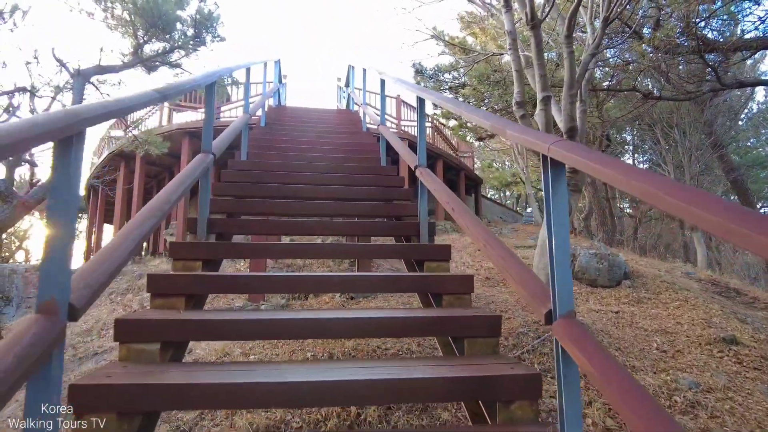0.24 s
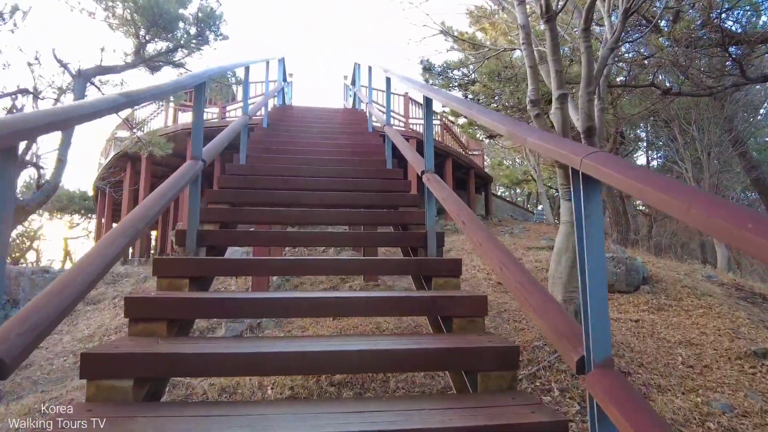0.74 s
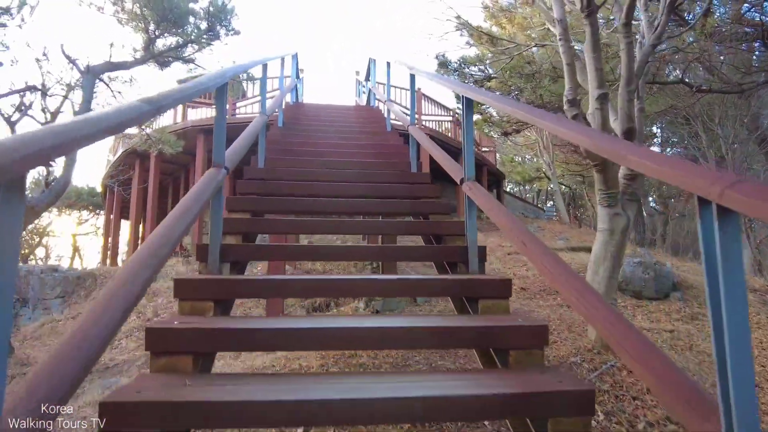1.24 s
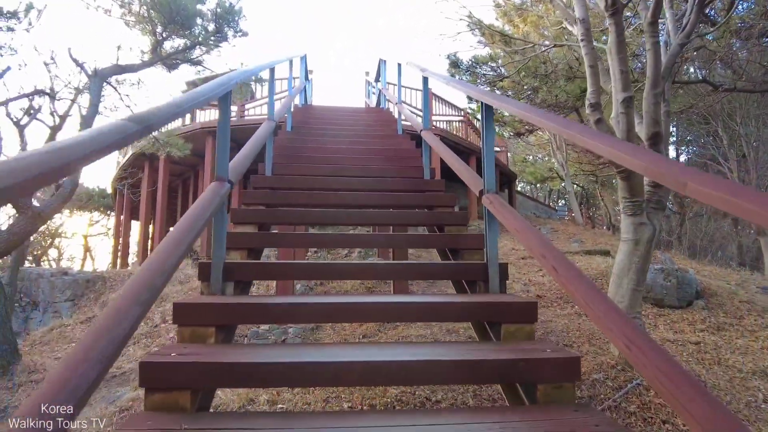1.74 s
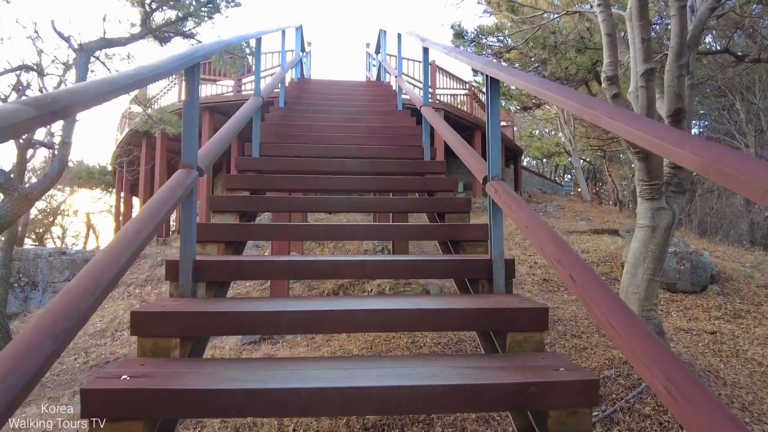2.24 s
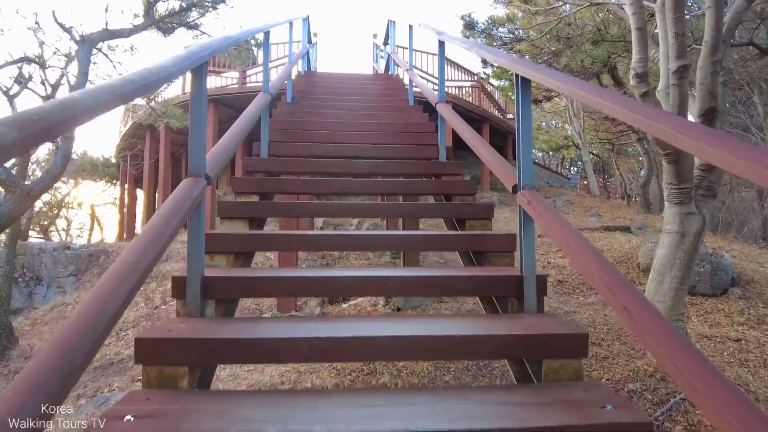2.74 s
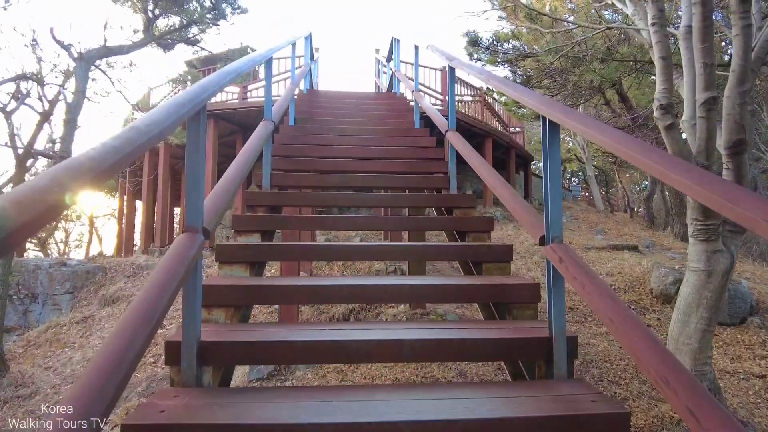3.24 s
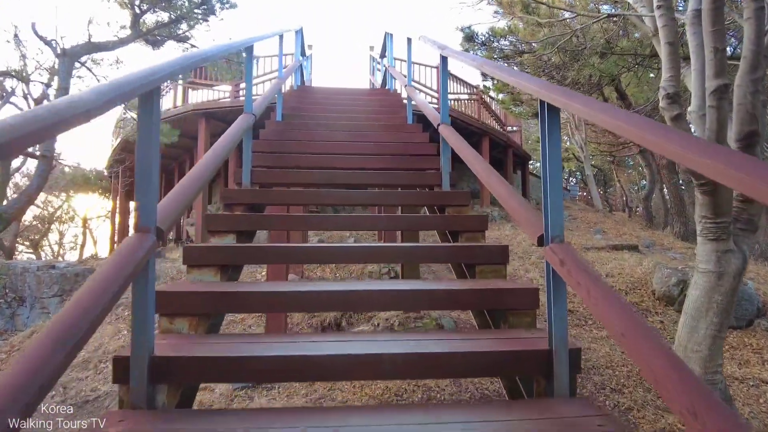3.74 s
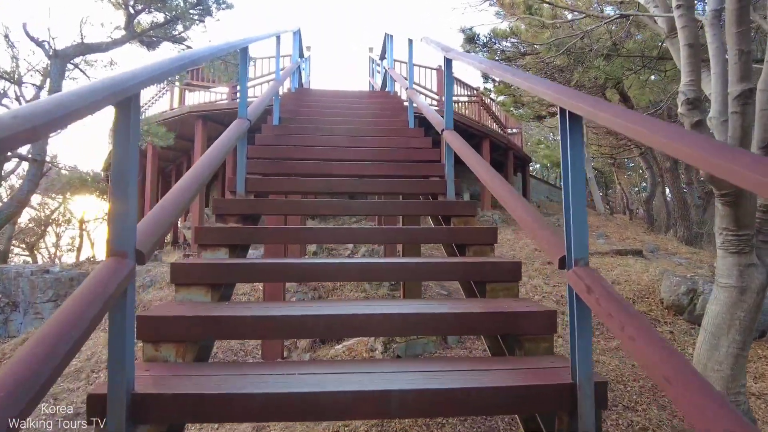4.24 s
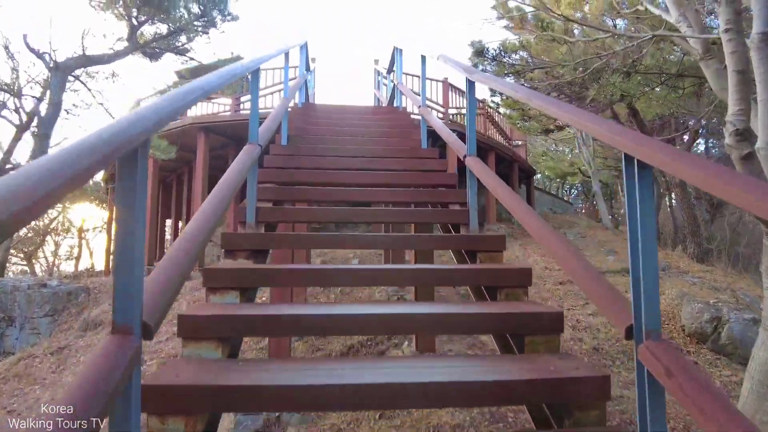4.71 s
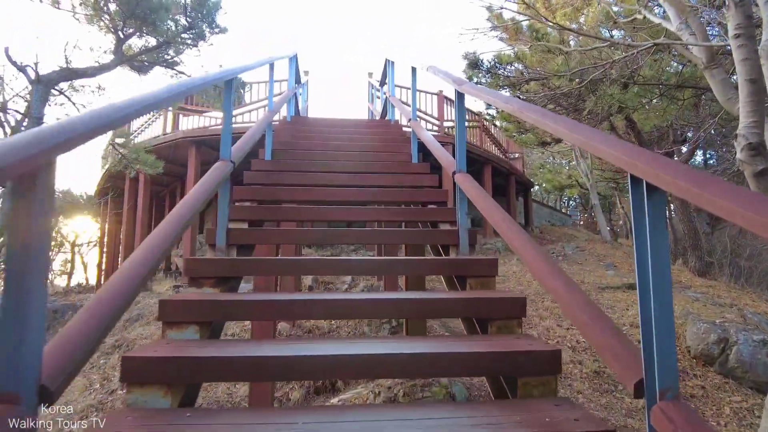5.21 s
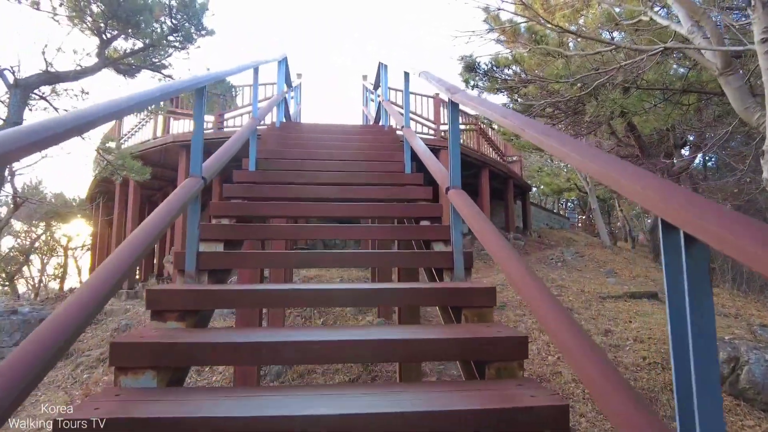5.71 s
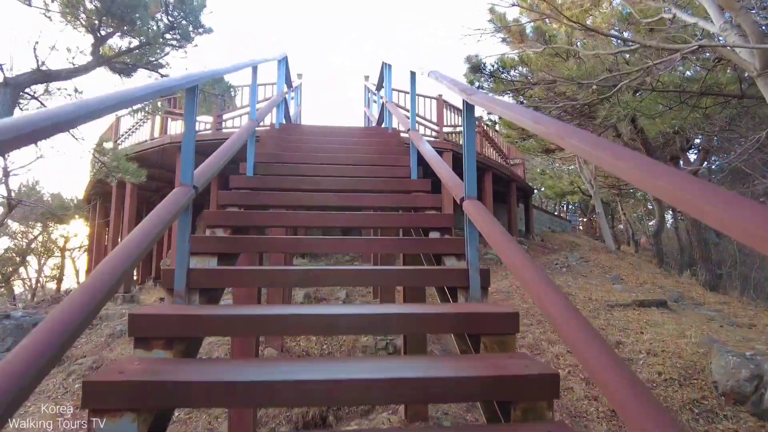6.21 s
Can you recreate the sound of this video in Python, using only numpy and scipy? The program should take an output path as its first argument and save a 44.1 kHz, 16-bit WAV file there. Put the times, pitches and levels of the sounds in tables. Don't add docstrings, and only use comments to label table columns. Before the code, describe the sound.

One person climbs an outdoor wooden staircase. Soft rubber soles slap, scuff and knock hollowly on the planks about twice a second, some steps firm, others faint, the first strongest with a low thump. Clothes swish between steps and small gear ticks appear. A deep distant rumble and faint hiss continue underneath. The carried stereo microphone sits close above the feet, with only a short open-air reflection.

```python
import sys
import numpy as np
from scipy import signal
from scipy.fft import rfft, irfft, next_fast_len
from scipy.io import wavfile
from scipy.ndimage import uniform_filter1d, map_coordinates

SR = 44100
rng = np.random.default_rng(int(sys.argv[2]) if len(sys.argv) > 2 else 0)


def store_pcm(level_fs):
    pcm = np.round(np.clip(level_fs, -1, 1) * 32767).astype(np.int16)
    wavfile.write(sys.argv[1], SR, np.atleast_2d(pcm).T)


def undo_db(level):
    steps = np.asarray(level, float) / 20
    return 10 ** steps


N = 285272
HALVES = np.array([[0.5], [-0.5]])

# (time [s], peak level [dB], slap pitch [Hz], knock level [dB], knock pitch [Hz])
SOLE_SLAPS = [(0.2753, -27.5, 786, -3.5, 190), (0.2769, -22, 874, -11, 223), (0.304, -48, 910, -12, 200),
              (1.124, -46.5, 536, 6.5, 210), (1.136, -24, 1007, -14.5, 250), (1.32, -61.5, 600, 13.5, 210),
              (1.533, -36.5, 600, 15.5, 409), (1.54, -33.5, 575, 8.5, 371), (1.9759, -40, 626, 1.5, 315),
              (1.993, -44.5, 1180, 4, 227), (2.362, -45, 1340, 2, 267), (2.776, -41, 590, 4, 260),
              (3.303, -40.5, 920, -21, 256), (3.646, -43, 930, 4, 189), (3.658, -33.5, 830, -1.5, 407),
              (4.108, -59.5, 634, 17, 352), (4.482, -41, 613, 4, 178), (4.495, -25, 1190, -6.5, 376),
              (5.275, -55, 1030, 17.5, 217), (5.289, -19.5, 1066, -17, 384), (5.8218, -45, 870, -19, 229),
              (6.092, -48.5, 606, 0.5, 283), (6.113, -46.5, 720, 3.5, 183)]
# (time [s], share of the port lag [0-1])
FOOT_BEARING = [(.28, 0.21), (1.13, 0.45), (1.54, 0.77), (1.98, 0.48), (2.37, 0.76), (2.78, 0.84),
                (3.3, 0.2), (3.65, 0.42), (4.11, 0.25), (4.49, 0.65), (5.28, 0.18), (5.8, 0.15),
                (6.1, 0.67)]
# (frequency [Hz], lag [rad])
FOOT_LAG = [(100, 0.5), (250, 0.5), (400, 1.23), (650, 2.06), (900, 4), (1100, 7), (1330, -2), (1500, 1),
            (3000, 6)]
# (frequency [Hz], level [dB])
SCUFF_SPECTRUM = [(100, -14), (200, 11), (500, 9), (1200, -3.5), (1700, -12), (3000, -24), (5000, -59),
                  (20000, -120)]
# (time [s], peak level [dB], centre [Hz], pan [dB])
EDGE_CRACKS = [(0.2757, -25, 1970, 2), (1.125, -40.5, 1610, -5), (1.1362, -39, 2280, -1),
               (1.532, -48, 1740, 9), (1.9767, -34, 1880, -1), (1.992, -42, 1770, -1.5),
               (2.364, -38, 2170, 0), (2.776, -34, 1760, -3), (2.785, -44, 1290, 4),
               (3.302, -57, 1530, 1.0), (3.658, -45, 2030, 1), (4.112, -57, 1500, 0),
               (4.4956, -42.5, 2160, 0), (5.2898, -39, 2310, -3), (6.0912, -48, 2680, -3),
               (6.094, -44, 1250, 0)]
# (time [s], peak level [dB], pitch [Hz], t60 [s], rise [s])
SPAN_THUDS = [(0.2745, -19.5, 123, 0.1, 0.015), (0.305, -25, 100, 0.083, 0.01),
              (0.341, -36, 107.3, 0.39, 0.0012), (1.132, -40, 109.4, 0.27, 0.016),
              (1.261, -51, 102, 0.31, 0.0092), (1.532, -26.5, 119, 0.13, 0.013),
              (1.649, -42.5, 111.5, 0.15, 0.016), (1.717, -46, 113, 0.18, 0.011),
              (1.994, -29, 106, 0.21, 0.019), (2.202, -50, 109, 0.14, 0.014),
              (2.354, -45, 112.3, 0.42, 0.012), (2.43, -45, 109, 0.21, 0.0079),
              (2.7729, -31.5, 112.5, 0.12, 0.0088), (2.799, -37, 103, 0.18, 0.0075),
              (3.663, -42, 102, 0.23, 0.0063), (4.491, -37.5, 95, 0.3, 0.022),
              (4.537, -43, 98, 0.067, 0.01), (5.276, -33.5, 137.3, 0.18, 0.028),
              (5.765, -37.5, 56, 0.13, 0.0071), (6.09, -43, 110.2, 0.21, 0.025)]
# (time [s], click level [dB], body level [dB], bright level [dB], body pitch [Hz])
GEAR_TICKS = [(0.1277, -57, 5, -20, 1370), (0.185, -63, 10, -25, 1100), (0.398, -46.5, 1.5, -31, 1380),
              (0.685, -61, 8, -30, 800), (0.775, -55.5, 12, -30, 600), (0.826, -59, 15, -25, 1500),
              (1.0963, -63.5, 13, -13, 1490), (1.365, -64, -9, -6, 2500), (1.6275, -50.5, -5, -19, 1290),
              (1.727, -69, -9, 6, 1300), (1.7853, -70, -6, 5, 1300), (2.514, -39.5, -12, -10.5, 700),
              (2.526, -43.5, -12, -14, 600), (3.062, -60, -2, -19, 1500), (3.2455, -61, 8, -8, 1195),
              (3.256, -48, -11, -8.5, 1300), (3.262, -62, 2, -12, 1500), (3.2713, -60, 3, -14, 1890),
              (3.2768, -55, -2, -6, 1200), (3.2873, -49, -3, -9, 1500), (3.3057, -54.5, -11, -0.5, 1300),
              (3.3124, -48, 5.5, -11, 1260), (3.6345, -52, 5, -11, 1290), (3.965, -61, -8.5, -5, 1300),
              (4.2083, -56, 5.5, -9, 1430), (4.5358, -53, -6, -6, 1300), (4.5921, -52, 4.5, -15, 1200),
              (4.675, -52, -1, -30, 1500), (5.624, -62, 11, -25, 1500), (5.7615, -49, 3, -25, 1140),
              (5.7804, -46.5, -4, -22, 1200), (5.834, -59, 9, -34, 1300), (6.19, -58, 8, -21, 1600),
              (6.4248, -55.5, -4, -9, 1390)]
# (frequency [Hz], level [dB])
SNAP_SPECTRUM = [(1300, -0.5), (2200, -3.5), (3500, -7), (4800, -15), (6500, -61)]
# (frequency [Hz], level [dB])
SPARK_SPECTRUM = [(4000, -12), (5500, -5), (8500, -12), (12000, -19), (15500, -19)]
# (peak time [s], rise [s], fall [s], level [dB], brightness [dB])
CLOTH_RUBS = [(0.034, 0.12, 0.077, -74.5, -0.5), (0.227, 0.17, 0.23, -66, 0.5),
              (0.382, 0.3, 0.15, -67.5, -4.5), (0.74, 0.19, 0.17, -61, -1), (0.969, 0.089, 0.44, -77, -2),
              (1.174, 0.11, 0.13, -70, -1.5), (1.33, 0.18, 0.29, -80.5, 0), (1.47, 0.057, 0.12, -71, -5.5),
              (1.56, 0.072, 0.3, -76.5, 3.5), (1.67, 0.16, 0.062, -80.5, 3), (1.8, 0.067, 0.23, -76, 1),
              (2.0, 0.19, 0.13, -63.5, 2.5), (2.102, 0.044, 0.079, -68.5, 4),
              (2.403, 0.28, 0.25, -67.5, 1.5), (2.511, 0.18, 0.13, -67.5, -11),
              (2.667, 0.11, 0.37, -69, -2), (2.882, 0.14, 0.16, -67.5, 1.5),
              (3.297, 0.69, 0.12, -81.5, -1.5), (3.616, 0.11, 0.37, -74, -2.5),
              (3.8, 0.24, 0.17, -73.5, -1), (4.066, 0.35, 0.067, -71, -1.7),
              (4.163, 0.25, 0.28, -73.5, -1.5), (4.56, 0.37, 0.08, -71, -43),
              (4.91, 0.62, 0.083, -67.5, -2.5), (5.088, 0.52, 0.11, -72, -1.5),
              (5.353, 0.13, 0.33, -70, -2), (5.53, 0.2, 0.048, -73, -0.5), (5.68, 0.09, 0.43, -70.5, -10),
              (5.85, 0.25, 0.057, -62.5, -2.5), (6.16, 0.14, 0.16, -70.5, -3),
              (6.27, 0.11, 0.089, -77, -1.5), (5.99, 0.062, 0.13, -80, -11)]
# (peak time [s], rise [s], fall [s], level [dB])
SHELL_SLIDES = [
    (1.94, 0.071, 0.079, -72.5),
    (2.96, 0.43, 0.07, -77),
    (3.718, 0.043, 0.21, -80),
    (4.844, 0.085, 0.11, -67.5),
    (5.51, 0.24, 0.046, -86),
    (5.851, 0.04, 0.29, -94),
]
# (frequency [Hz], level [dB per Hz])
FOLD_SPECTRUM = [(400, -2), (700, -4.5), (1080, -4), (1350, -1), (1650, -5.5), (2000, -12.5), (3000, -41)]
# (frequency [Hz], level [dB per Hz])
SWISH_SPECTRUM = [(1500, -1), (2200, -3.5), (2900, -1.5), (3500, -8), (4500, -9.5), (6500, -34)]
# (frequency [Hz], level [dB per Hz])
WEAVE_SPECTRUM = [(3500, -6.5), (5000, -1.5), (7000, -4), (11000, -14), (13500, -38)]
# (frequency [Hz], level [dB per Hz])
SHEEN_SPECTRUM = [(8000, -7.5), (10500, -4.5), (13000, -1), (15500, 1.5), (17000, -20)]
# (frequency [Hz], t60 [s])
HILLSIDE_DECAY = [(150, 0.29), (1000, 0.088), (5000, 0.16)]
# (time [s], level [dB])
RUMBLE_LEVEL = [(0, -48), (.3, -48.5), (.55, -45), (1.1, -46.5), (1.9, -49), (2.3, -47.5), (2.9, -45),
                (3.5, -47), (3.95, -45.5), (4.5, -49), (4.8, -46), (5.2, -52.5), (5.6, -48.5), (6, -50.5),
                (6.44, -45), (6.47, -50)]
# (frequency [Hz], level [dB per Hz])
RUMBLE_SPECTRUM = [(8.8, -35), (15, 2), (54, 7), (84, -2), (140, -23), (180, -50), (310, -120)]
# (time [s], level [dB])
HUM_LEVEL = [(0, -58), (.25, -59.5), (.55, -61), (.8, -55), (1.3, -58), (1.7, -56.5), (2.4, -61),
             (3, -58.5), (3.3, -58), (3.45, -57.5), (3.58, -57), (3.9, -60), (4.7, -49.5), (4.95, -60),
             (5.15, -57.5), (5.6, -57), (6.05, -56.5), (6.47, -58.5)]
# (frequency [Hz], level [dB per Hz])
HUM_SPECTRUM = [(59, -36.5), (100, -3.5), (156, -6), (312, -14), (404, -13.5), (687, -26.5), (1000, -33.5),
                (1300, -92)]
# (frequency [Hz], level [dB per Hz])
HISS_SPECTRUM = [(470, -44), (800, -5.5), (1300, -6.5), (2100, -15), (7000, -20), (12600, -27.5),
                 (13200, -43)]
# (frequency [Hz], correlation [-1 to 1])
PORT_LIKENESS = [(60, 0.99), (220, 0.9), (400, 0.69), (650, 0.29), (1000, 0.18), (1500, 0.85), (2700, 0.54),
                 (5000, 0.29), (11000, 0.14)]
# (frequency [Hz], lead [rad])
LEFT_LEAD = [(60, 0), (220, .2), (400, .5), (650, 1), (950, 2.6), (1120, 2.6), (1300, .4), (2700, 1),
             (5000, .6), (11000, -.8)]


def unit(x):
    return x / np.sqrt(np.mean(x ** 2) + 1e-20)


def peak_one(x):
    return x / np.abs(x).max()


def along(points, hz):
    f, v = np.transpose(points)
    return np.interp(np.log(hz + 1), np.log(f + 1), v)


def over_time(rows):
    s, value = np.transpose(rows)
    return np.interp(np.arange(N) / SR, s, value)


def wobble(rate):
    knots = rng.standard_normal(int(N * rate / SR) + 4)
    return map_coordinates(knots, [np.arange(N) * rate / SR])


def filtered(x, response):
    m = next_fast_len(x.shape[-1] + 4096)
    return irfft(rfft(x, m) * response(np.fft.rfftfreq(m, 1 / SR)), m)[..., :x.shape[-1]]


def band(hz, centre_hz, width):
    return np.exp(-(np.log((hz + 1) / centre_hz) / width) ** 2)


def pan(db):
    return undo_db(db * HALVES)


def port_phase(lead_rad):
    return np.exp(1j * lead_rad * HALVES)


def rush(spectrum, patchy_db):
    z = signal.stft(rng.standard_normal((2, N)), nperseg=512)[2]
    field = uniform_filter1d(rng.standard_normal(z.shape[1:]), size=8, axis=0)
    field = uniform_filter1d(field, size=8, axis=1)
    pair = signal.istft(z * undo_db(patchy_db * unit(field)), nperseg=512)[1][:, :N]
    closed = [(spectrum[0][0] / 2, -120)] + list(spectrum) + [(spectrum[-1][0] * 2, -120)]

    def mid_side(hz):
        angle = np.arccos(np.clip(along(PORT_LIKENESS, hz), -1, 1)) / 2
        return undo_db(along(closed, hz)) * [np.cos(angle), np.sin(angle)]

    mid, side = filtered(pair, mid_side)
    stereo = np.array([mid + side, mid - side])
    return unit(filtered(stereo, lambda hz: port_phase(along(LEFT_LEAD, hz))))


def ring(t, hz, t60, rise):
    u = np.maximum(t, 0)
    return np.sin(2 * np.pi * hz * u) * undo_db(-60 * u / t60) * (1 - np.exp(-u / rise))


def add(track, s, piece, lead):
    at = round(s * SR) - lead
    track[..., at:at + piece.shape[-1]] += piece


def slaps():
    out, t = np.zeros((2, N + SR)), np.arange(-1536, 5120) / SR

    def swell(rise, fall):
        return 1 / (undo_db(-60 * t / rise) + undo_db(60 * t / fall))

    for s, db, slap_hz, knock_db, knock_hz in SOLE_SLAPS:
        lag = np.interp(s, *np.transpose(FOOT_BEARING))
        push = undo_db(-4.5) * np.exp(-((t - 0.0005) / 0.00029) ** 2)
        back = np.maximum(t - 0.0008, 0) / 0.00063
        push -= undo_db(-6.5) * back * np.exp(-back)
        slap = ring(t, slap_hz, t60=0.017, rise=0.00036)
        slap += undo_db(1.0) * ring(t, 0.88 * slap_hz, t60=0.0061, rise=0.00062)
        knock = ring(t, knock_hz, t60=0.055, rise=0.00085)
        knock += undo_db(-0.5) * ring(t, 1.385 * knock_hz, t60=0.018, rise=0.0011)
        knock += undo_db(-7.5) * ring(t, 0.594 * knock_hz, t60=0.049, rise=0.00021)

        noise = rng.standard_normal((2, 2, len(t)))
        grit = noise[0, 0] + 0.61 * noise[0, ::-1]
        grit = unit(filtered(grit, lambda hz: undo_db(along(SCUFF_SPECTRUM, hz))))
        grit *= undo_db(-3.5 + 0.5 * knock_db) * swell(rise=0.022, fall=0.048)
        murmur = noise[1, 0] + 0.91 * noise[1, ::-1]
        murmur = unit(filtered(murmur, lambda hz: band(hz, slap_hz, width=0.34)))
        murmur *= undo_db(-21) * swell(rise=0.055, fall=0.085)

        def ports(hz):
            rubber = 1 / (1 + (hz / 3000) ** 4)
            return port_phase(lag * along(FOOT_LAG, hz)) * rubber

        blow = filtered(grit + murmur - (push + slap + undo_db(knock_db) * knock), ports)
        add(out, s + 0.00081, undo_db(db + 2) * blow, lead=1536)
    return out[:, :N]


def cracks():
    out, t = np.zeros((2, N + SR)), np.arange(-256, 1024) / SR
    for s, db, centre_hz, pan_db in EDGE_CRACKS:
        noise = rng.standard_normal((3, len(t))) * undo_db(-60 * t / 0.02) * (t > 0)

        def response(hz):
            bells = band(hz, centre_hz, width=0.37) + undo_db(-20) * band(hz, 3800, width=0.21)
            return port_phase(along(LEFT_LEAD, hz)) * bells

        crack = peak_one(filtered(noise[0] + 0.5 * noise[1:], response))
        add(out, s, undo_db(db - 5) * pan(pan_db) * crack, lead=256)
    return out[:, :N]


def thuds():
    out, t = np.zeros(N + SR), np.arange(SR // 3) / SR
    for s, db, hz, t60, rise in SPAN_THUDS:
        neighbour = undo_db(-24) * ring(t, hz * rng.choice([0.8, 1.22]), 1.7 * t60, rise)
        add(out, s, -undo_db(db + 8) * (ring(t, hz, t60, rise) + neighbour), lead=0)
    return filtered(out[:N], lambda hz: port_phase(0.11 * (hz > 0)))


def ticks():
    out, t = np.zeros((2, N + SR)), np.arange(-256, 1024) / SR
    for s, db, body_db, bright_db, body_hz in GEAR_TICKS:
        noise = rng.standard_normal((3, len(t))) * undo_db(-60 * t / 0.006) * (t > 0)
        snap = filtered(noise[0] + 0.5 * noise[1:], lambda hz: undo_db(along(SNAP_SPECTRUM, hz)))
        spark = filtered(noise[0] + 1.2 * noise[1:],
                         lambda hz: undo_db(along(SPARK_SPECTRUM, hz)) * (hz > 3000))
        body = undo_db(body_db + 1.5) * ring(t, body_hz, t60=0.0069, rise=0.00025)
        tick = body + peak_one(snap) + undo_db(bright_db + 0.5) * peak_one(spark)
        add(out, s, undo_db(db + 4) * pan(3.5) * tick, lead=256)
    return out[:, :N]


def strokes(rows, layer_db, tilt=0):
    peak, rise, fall, db, *bright = np.transpose(rows)[..., None]
    coarse = np.arange(0, N, 64)
    u = coarse / SR - peak
    shape_db = -20 * np.abs(u / np.where(u < 0, rise, fall)) ** 1.67
    power = np.sum(undo_db(db + layer_db + tilt * sum(bright) + shape_db) ** 2, axis=0)
    return np.interp(np.arange(N), coarse, np.sqrt(power))


def clothes():
    slip_db = 0.9 * wobble(30) + 1.1 * wobble(180)
    fold = strokes(CLOTH_RUBS, layer_db=3.5, tilt=-0.081)
    swish = np.hypot(strokes(CLOTH_RUBS, layer_db=2.5), strokes(SHELL_SLIDES, layer_db=4.5))
    weave = np.hypot(strokes(CLOTH_RUBS, layer_db=-0.5, tilt=1.86), strokes(SHELL_SLIDES, layer_db=2.5))
    sheen = np.hypot(strokes(CLOTH_RUBS, layer_db=-5, tilt=1.66), strokes(SHELL_SLIDES, layer_db=7.5))
    fold = fold * undo_db(1.26 * slip_db) * rush(FOLD_SPECTRUM, patchy_db=1.74)
    swish = swish * undo_db(slip_db) * rush(SWISH_SPECTRUM, patchy_db=1.3)
    weave = weave * undo_db(0.7 * slip_db) * rush(WEAVE_SPECTRUM, patchy_db=2.0)
    sheen = sheen * undo_db(0.47 * slip_db[::-1]) * rush(SHEEN_SPECTRUM, patchy_db=1.5)
    return fold + (swish + weave + sheen) * pan(2)


def hillside(x):
    hz, t, z = signal.stft(rng.standard_normal((2, SR // 3)), SR, nperseg=256)
    decay = undo_db(-60 * t / along(HILLSIDE_DECAY, hz)[:, None])
    tail = signal.istft(z * decay, SR, nperseg=256)[1]
    late = np.pad(x, ((0, 0), (200, 0)))
    return signal.fftconvolve(late, tail / np.linalg.norm(tail[0]), axes=1)[:, :N]


def valley():
    rumble = undo_db(over_time(RUMBLE_LEVEL)) * rush(RUMBLE_SPECTRUM, patchy_db=0.22)
    hum_db = over_time(HUM_LEVEL) + 2.2 * wobble(6.2) + 1.44 * wobble(21)
    hum = undo_db(hum_db) * rush(HUM_SPECTRUM, patchy_db=1.2)
    hiss = undo_db(-75) * rush(HISS_SPECTRUM, patchy_db=0.4)
    return rumble + hum + hiss


def scene():
    contacts = slaps() + cracks() + ticks()
    return contacts + undo_db(-12.5) * hillside(contacts) + thuds() + clothes() + valley()


def top_cut(x):
    return signal.sosfilt(signal.butter(12, 16800, fs=SR, output="sos"), x)


def record(dry):
    mix = filtered(dry, lambda hz: hz < 15750)
    return top_cut(mix)


dry = scene()
out = record(dry)
store_pcm(out)
```